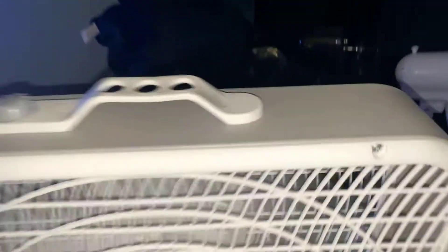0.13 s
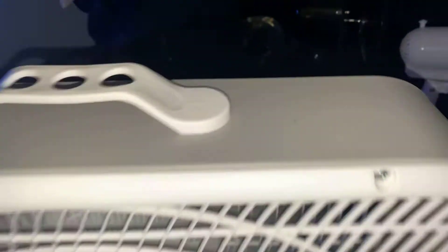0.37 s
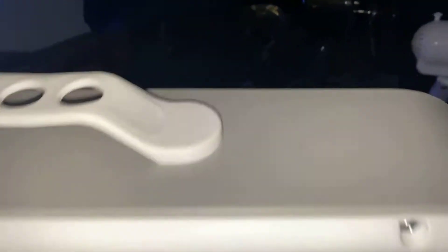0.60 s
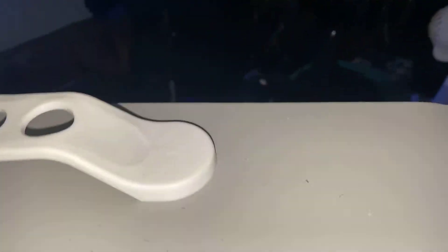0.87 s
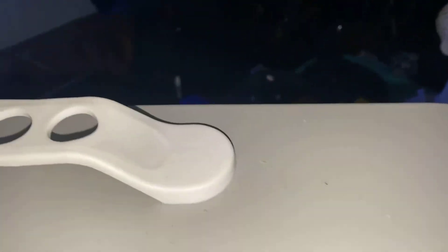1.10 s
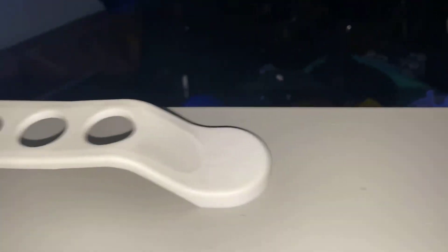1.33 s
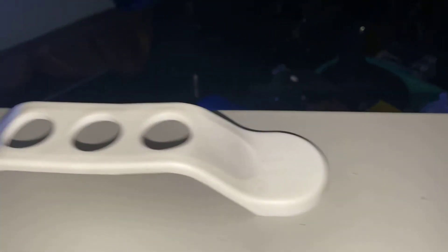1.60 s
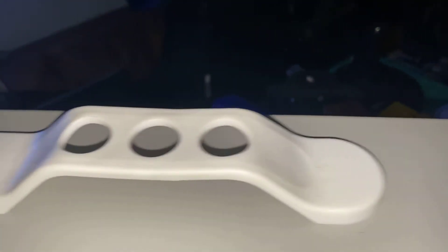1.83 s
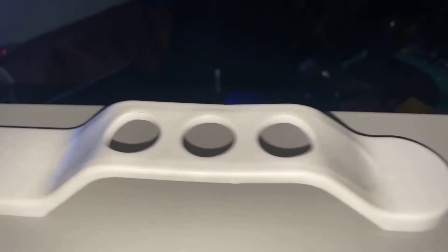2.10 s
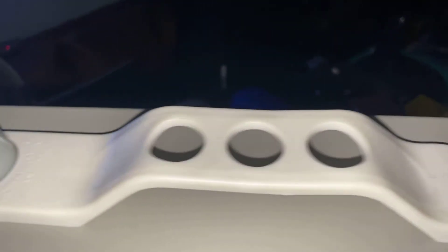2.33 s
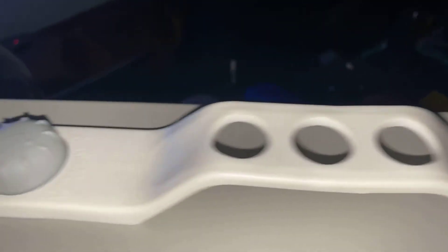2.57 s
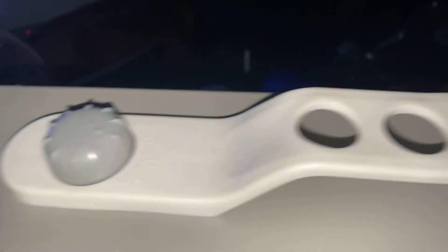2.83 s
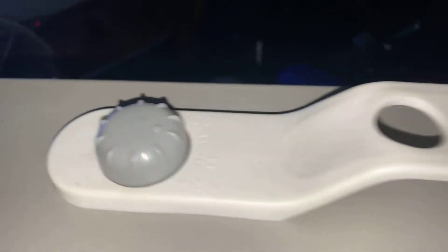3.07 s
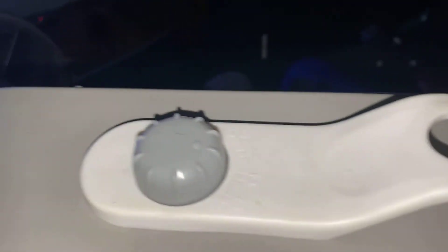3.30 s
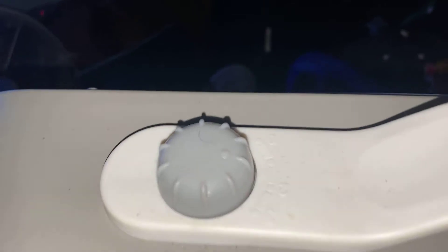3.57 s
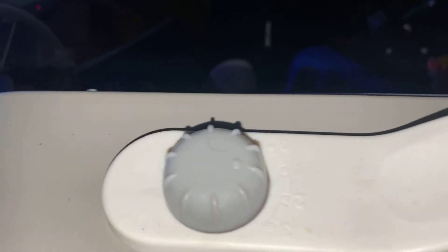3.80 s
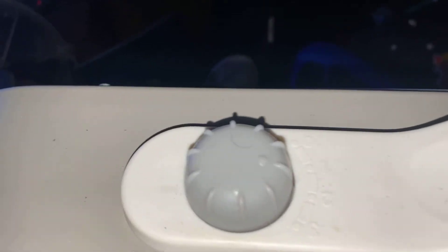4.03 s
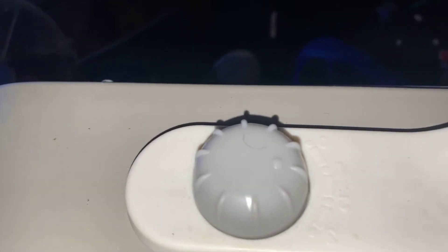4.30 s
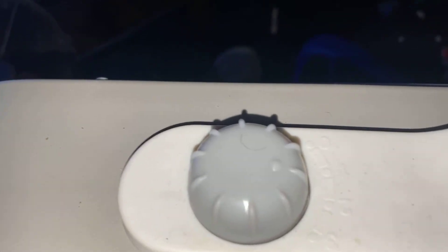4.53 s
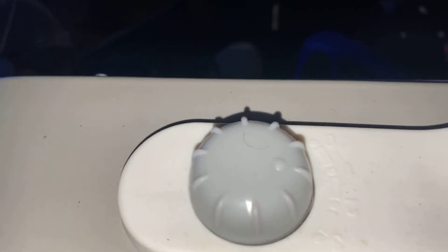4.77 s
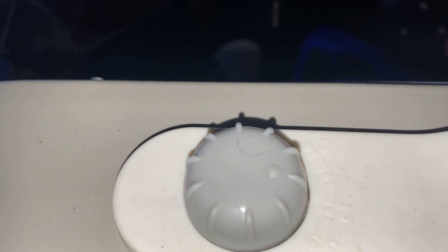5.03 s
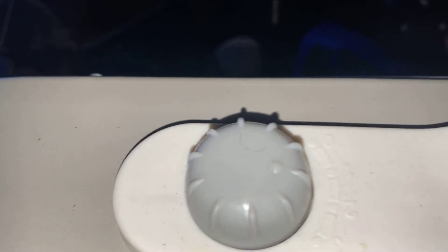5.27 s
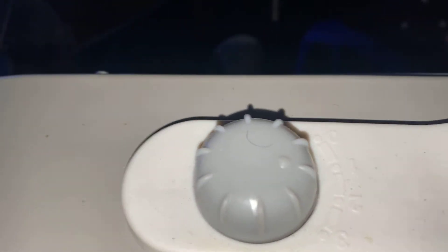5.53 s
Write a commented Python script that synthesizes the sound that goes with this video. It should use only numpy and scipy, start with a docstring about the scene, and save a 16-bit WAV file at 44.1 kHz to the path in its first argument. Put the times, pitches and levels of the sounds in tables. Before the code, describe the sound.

A box fan hums steadily indoors, deep and slightly throbbing, with a broad rush of chopped air as the microphone moves in close along it.

```python
"""Box fan, passed by a microphone

A five-bladed box fan hums indoors while a hand-held stereo microphone glides in and along the top of its frame.
The hum is made of sines locked to the turning shaft; blades that are not all alike add a slower beat.
Below and around it lie narrow humps of noise, the air chopped by the blades.
A wide band of flickering noise is the rush of air through the grille."""
import sys
import numpy as np
from scipy import signal
from scipy.fft import rfft, irfft
from scipy.io import wavfile
from scipy.ndimage import uniform_filter1d

SR = 44100
rng = np.random.default_rng(int(sys.argv[2]) if len(sys.argv) > 2 else 0)


def voltage_ratio(decibels):
    """Convert decibels (scalar or array-like) to amplitude ratios, 20 dB per decade."""
    exponent = np.asarray(decibels, float) / 20
    return 10 ** exponent


def output_pcm(signal):
    """Save a mono or channel-first signal as 16-bit PCM at the path in sys.argv[1].

    Samples are clipped to [-1, 1] before scaling.
    """
    pcm = np.clip(np.atleast_2d(signal).T, -1, 1) * 32767
    wavfile.write(sys.argv[1], SR, np.round(pcm).astype(np.int16))


N = 248724
TIME = np.arange(N) / SR

# How fast the shaft is heard to turn: (time [s], speed [turns per s])
SHAFT_SPEED = [(0.0, 14.547), (0.5, 14.547), (1.0, 14.568), (2.0, 14.586), (3.0, 14.551), (3.5, 14.517),
               (4.0, 14.476), (4.5, 14.433), (5.0, 14.393), (5.64, 14.369)]
# Hum along the way: (time [s], blade tone level [dB], octave level [dB])
HUM_LEVELS = [(0, -43, -38), (.15, -35.5, -40), (.45, -29.5, -36), (.72, -26, -40), (.95, -27, -39.5),
              (1.2, -27, -38.5), (1.5, -29, -35.5), (1.8, -29, -39), (1.95, -31, -36.5), (2.2, -29, -39.5),
              (2.6, -32, -38), (2.8, -32.5, -35), (3.0, -38, -36), (3.15, -33, -33), (3.5, -35, -29.5),
              (3.8, -37, -35.5), (4.1, -35.5, -33), (4.65, -36, -36), (5.0, -36, -37.5), (5.2, -37, -35.5),
              (5.4, -37.5, -38), (5.64, -38, -33.5)]
# Tones of unequal blades: (multiple of the shaft speed [-], base level [dB], added left-right level [dB],
# left-right lead [rad], how much the level follows the beat's left-right change [dB per dB])
UNEVEN_BLADES = [(2, -57, -7, 2.5, .2), (3, -48, -3, 2.5, 0), (4, -43.5, 1, 2.5, -.2),
                 (6, -48, 4, 1.6, 1.4), (7, -56, 2, 1.0, 0)]
# Eddies cut by several blades in turn pile up just under the blade multiples:
# (centre [Hz], width [Hz], base level [dB], change at the far corner [dB])
CHOPPED_EDDIES = [(69, 19, -44.5, 0), (118, 8.7, -53, 1), (132.3, 10.8, -47.5, 1), (153, 14.4, -52.5, 3.5),
                  (202, 24.6, -44, -3.5), (229, 34, -52, -3.5), (276.7, 36.5, -45, -1.5),
                  (359.2, 20, -52, -5), (570, 168, -47, -5.5)]
# Colour of the rush, of which only the shape counts: (frequency [Hz], level per Hz [dB])
AIR_COLOUR = [(30, -27), (70, -5), (170, -1.5), (320, -2), (600, -6), (1050, -7.5), (1600, -12),
              (2300, -14), (2800, -16.5), (3500, -22), (5000, -26.5), (7500, -33.5), (9000, -36),
              (10500, -39.5), (12000, -42), (13000, -45), (14500, -46.5), (15200, -53), (15500, -60)]
# Colour change of the rush by place, against the near corner:
# (frequency [Hz], from afar [dB], over the middle [dB], at the far corner [dB])
AIR_BY_PLACE = [(200, -1.5, 2.4, -1), (570, 2, 1.4, 0.3), (850, 1.5, 2, -1.5), (1190, 3.5, 0, 3),
                (1600, 3.5, 2.5, -2.2), (2300, 0.3, 3.6, -1.4), (3100, 0.5, -1.6, 0.3),
                (4200, 3.5, 1, -2.5), (5700, 3.5, 0.8, -2), (8000, 3, 0.9, -3.5), (13000, 4, -0.5, -3)]
# Swell of the air noise: (frequency [Hz], once a turn [dB], its lead [rad],
# once a blade at the near corner [dB], at the far corner [dB], its lead [rad])
AIR_PULSE = [(160, 0, -2.9, 0, 0, -.45), (200, 1.3, -2.9, 2.2, .4, -.45), (350, 1, -2.9, 1.8, .4, -.3),
             (700, .45, -2.5, .9, .3, .6), (1400, .5, -1.8, .8, .95, .85), (2800, .6, -1.6, 0, 1.6, .3),
             (5600, .55, -1.2, .1, 0, 0)]
# Noise at the two microphone ports: (frequency [Hz], likeness at the near corner [0-1],
# likeness at the far corner [0-1], lead of the left [rad], left minus right [dB])
MIC_PORTS = [(100, 0.98, 0.65, 0.27, 3.5), (410, 0.98, 0.84, 0.32, 2.5), (805, 0.7, 0.7, -0.74, 2.5),
             (1130, 0.76, 0.88, 0.99, 1.5), (1610, 0, 0, -0.94, 1), (2160, 0.26, 0.75, 0.34, 0.5),
             (2840, 0.54, 0.43, 0.11, 2.5), (4300, 0.3, 0.57, 0.98, 2), (5760, 0.6, 0.27, 0.36, 6.5),
             (6940, 0.8, 0.7, 0, -1.5), (7800, 0, 0, -0.092, -0.5)]
# Top bands that come out the same (+1) or opposite (-1) left and right: (from [Hz], to [Hz], sign [-])
TOP_BANDS = [(8250, 8900, -1), (9620, 10900, 1), (11250, 12850, -1), (13150, 16000, 1)]


def blades(shaft):
    """Five blades pass per turn, giving a tone at 5 times the shaft speed and overtones that waver with the inflow."""
    # multiple of the shaft speed, pattern, waver of level [dB], waver of phase [rad]
    parts = ((5, tone_pattern, 0.5, 0.12), (10, octave_pattern, 0.9, 0.22),
             (9, flutter_pattern, 2.3, 0.7), (15, twelfth_pattern, 2.2, 0.25))
    out = 0
    for multiple, pattern, waver_db, waver_rad in parts:
        db, lead, side_db, side_lead = pattern()
        angle = multiple * shaft + lead + waver_rad * walk(7.4)
        out = out + tone(angle, db + waver_db * walk(5.94), side_db, side_lead)
    return out


def tone_pattern():
    """Standing pattern of the blade tone: level, lead on the shaft, left-right level and left-right lead."""
    db = curves(HUM_LEVELS)[0]
    lead = at_place(2.2, -3.05, -.1)
    along, _ = place()
    # a small left-right part dies out early in the slide, then a steady one grows in
    near_fade = np.clip(1 - along / .15, 0, 1)
    near = voltage_ratio(at_place(-16.5, 0, -4)) * np.exp(1j * 1.0) * near_fade
    far_lead = at_place(5.35, -.7, 0) - lead
    far = hub_reached() * voltage_ratio(-39.3 - db) * np.exp(1j * far_lead)
    side = near + far
    return db, lead, 20 * np.log10(abs(side)), np.angle(side)


def octave_pattern():
    """The same for the octave, whose left-right part hardly changes in size."""
    db = curves(HUM_LEVELS)[1]
    return db, at_place(-.45, -4.75, .2), at_place(-45, -.5, -8) - db, at_place(.75, 1.85, 0)


def flutter_pattern():
    """One shaft multiple under the octave rides with it, so that the octave flutters once a turn."""
    db, lead, side_db, side_lead = octave_pattern()
    return db - 12.5, lead - .6, side_db, side_lead


def twelfth_pattern():
    """The third blade multiple grows as the microphone nears the hub."""
    lead = at_place(7.6, -7.1, 0)
    return -54 + 20 * np.log10(hub_reached() + 0.089), lead, -9 + 0 * lead, 1.


def beat(shaft):
    """Unequal blades add the other shaft multiples, which together throb once a turn."""
    away = np.clip(1 - TIME / .62, 0, 1)  # the beat fades in over 0.62 s
    near_db = -1.5 + 1.8 * hub_reached() - 26 * away
    side_db = -14.5 + 10 * hub_reached() - 4 * away
    out = 0
    for multiple, db, own_side_db, side_lead, follow in UNEVEN_BLADES:
        # a curved spread of leads [rad] makes the beat sweep in pitch
        lead = 1.12 / 2 * (multiple - 4.08) ** 2 - .75
        level_db = db + near_db + follow * (side_db - side_db[-1]) + 0.51 * walk(2.4)
        out = out + tone(multiple * shaft + lead, level_db, side_db + own_side_db, side_lead)
    return out


def chop(shaft):
    """Narrow humps of noise from eddies sliced by the blades, coming in surges."""
    hz, noise = port_noise()
    along, _ = place()
    surge = walk(8.2)  # shared by all humps
    out = 0
    for centre_hz, width_hz, db, far_db in CHOPPED_EDDIES:
        hump = np.exp(-2 * ((hz - centre_hz) / width_hz) ** 2)
        hump_noise = noise * hump / np.sqrt(np.mean(hump ** 2))
        level_db = db + far_db * along + 1.6 * surge + 2.2 * walk(12) + pulsing(centre_hz, shaft)
        out = out + voltage_ratio(level_db) * heard(hump_noise)
    pan_db = rush_pan()
    chop_db = at_place(0.5, 0.7, -2.5)
    return out * voltage_ratio(chop_db + np.array([pan_db, -pan_db]) / 2)


def rush(shaft):
    """Air through the grille: noise in half octaves with shared gusts, own flicker, and pulses by blade and turn."""
    along, away = place()
    # strongest where the microphone passes the hub, 0.6 of the way along
    middle = np.exp(-((along - 0.6) / 0.33) ** 2)
    pan_db = rush_pan()
    hz, noise = port_noise()
    gain = voltage_ratio(by_hz(AIR_COLOUR, hz)[0]) * (hz > 20)
    noise = noise * gain / np.sqrt(np.mean(gain ** 2))
    gust, flutter = walk(22.21), walk(70)
    out = 0
    for octave in np.arange(-6.5, 3.5, .5):  # octaves from 2000 Hz
        centre_hz = 2000 * 2 ** octave
        # neighbouring bands overlap and add up to the whole
        share = np.cos(np.pi * np.clip(np.log2(hz / 2000) - octave, -.5, .5)) ** 2
        high = np.clip((octave + 2) / 4, 0, 1)  # 0 up to 500 Hz, 1 from 8000 Hz
        shared_db = (0.32 + 0.083 * high) * gust + (.5 + 0.25 * high) * flutter
        wander_db = shared_db + (0.88 + .5 * high) * walk(45)
        wander_db = wander_db - uniform_filter1d(wander_db, size=SR // 7)  # puffs are brief, with no slow swell
        wander_db = wander_db * (1 + 0.51 * (1 - high) * away)
        afar_db, middle_db, far_db = by_hz(AIR_BY_PLACE, centre_hz)
        place_db = afar_db * away + middle_db * middle + far_db * along
        band_db = -37.5 + place_db + pulsing(centre_hz, shaft) + wander_db
        side_db = (1 - high) * np.array([pan_db, -pan_db]) / 2
        out = out + voltage_ratio(band_db + side_db) * heard(noise * share)
    return out


def rush_pan():
    """Left minus right of the air noise [dB], drifting with the microphone's place."""
    return at_place(0, -4.5, -1)


def pulsing(hz, shaft):
    """Swell of the air noise near hz with each turn and each blade [dB]."""
    turn_db, turn_rad, near_db, far_db, blade_rad = by_hz(AIR_PULSE, hz)
    along, _ = place()
    blade_db = near_db + (far_db - near_db) * along
    return turn_db * np.cos(shaft + turn_rad) + blade_db * np.cos(5 * shaft + blade_rad)


def port_noise():
    """Spectra of white noise: left port, then right port with its near- and far-corner likeness to the left."""
    hz = np.maximum(np.fft.rfftfreq(N, 1 / SR), 1)
    *likes, lead, pan_db = by_hz(MIC_PORTS, hz)
    like = np.clip(likes, -1, 1)
    a, b = rfft(rng.standard_normal((2, N)))
    right = like * np.exp(-1j * lead) * a + np.sqrt(1 - like ** 2) * b
    return hz, np.array([a * voltage_ratio(pan_db / 2), *(right * voltage_ratio(-pan_db / 2))])


def heard(spectra):
    """Left, and right as it turns from its near-corner to its far-corner likeness."""
    left, near, far = irfft(spectra, N)
    return np.array([left, near + hub_reached() * (far - near)])


def tone(angle, db, side_db, side_lead):
    """A sine whose left-right part has its own size and lead."""
    side = voltage_ratio(side_db) * np.exp(1j * side_lead)
    left_right = np.exp(1j * angle) * np.array([1 + side, 1 - side])
    return np.sqrt(2) * voltage_ratio(db) * left_right.real


def place():
    """The microphone closes in, waits, then slides: share of the slide done, share of the approach still to go."""
    slide_from_s, slide_to_s, arrive_s = 1.25, 4.15, 1
    along = np.clip((TIME - slide_from_s) / (slide_to_s - slide_from_s), 0, 1)
    away = np.clip(1 - TIME / arrive_s, 0, 1) ** 1.36
    return along, away


def at_place(near_corner, slide_change, afar_change):
    """A quantity that changes in step with the microphone's place."""
    along, away = place()
    return near_corner + slide_change * along + afar_change * away


def hub_reached():
    """Rises from 0 to 1 between 0.075 and 0.58 of the slide, as the microphone nears the hub."""
    along, _ = place()
    return np.clip((along - .15 / 2) / (.58 - .15 / 2), 0, 1)


def walk(rate):
    """Random levels drawn rate times a second and smoothed twice; spread near 1."""
    k = int(SR / rate)
    steps = np.repeat(rng.standard_normal(N // k + 1), k)
    return 0.81 * uniform_filter1d(uniform_filter1d(steps, k), k)[:N]


def curves(table):
    """Columns of a time table, sample by sample."""
    s, *columns = np.transpose(table)
    return [np.interp(TIME, s, c) for c in columns]


def by_hz(table, hz):
    """Columns of a frequency table, read on a log frequency axis."""
    at, *columns = np.transpose(table)
    return [np.interp(np.log(hz), np.log(at), c) for c in columns]


def scene():
    """Tones and air, all tied to one shaft angle."""
    shaft = 2 * np.pi * np.cumsum(curves(SHAFT_SPEED)[0]) / SR
    return blades(shaft) + beat(shaft) + chop(shaft) + rush(shaft)


def top_cut(x):
    """Nothing passes above the cut-off."""
    return signal.sosfilt(signal.butter(12, 15700, fs=SR, output="sos"), x)


def record(dry):
    """Above 8 kHz, whole bands are made either centred or opposite in phase left and right."""
    hz = np.fft.rfftfreq(N, 1 / SR)
    left, right = rfft(dry)
    for lo_hz, hi_hz, sign in TOP_BANDS:
        band = (hz > lo_hz) & (hz < hi_hz)
        kept = (left + sign * right) / np.sqrt(2)
        left = np.where(band, kept, left)
        right = np.where(band, sign * kept, right)
    mix = irfft(np.array([left, right]), N)
    return top_cut(mix)


dry = scene()
out = record(dry)
output_pcm(out)
```